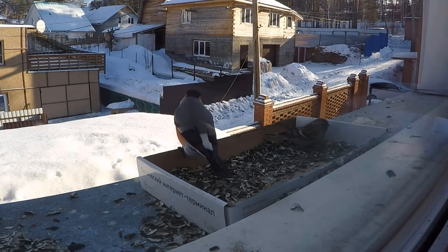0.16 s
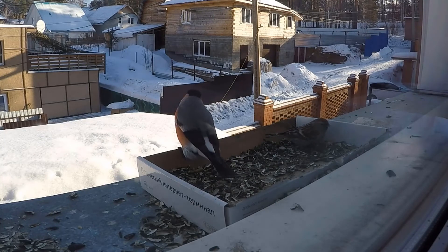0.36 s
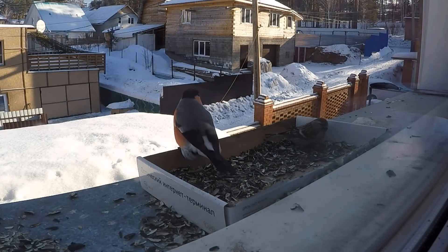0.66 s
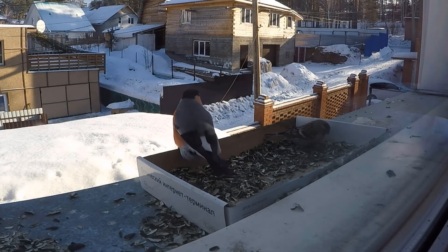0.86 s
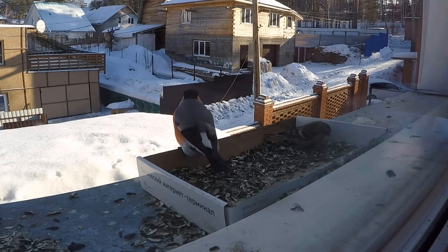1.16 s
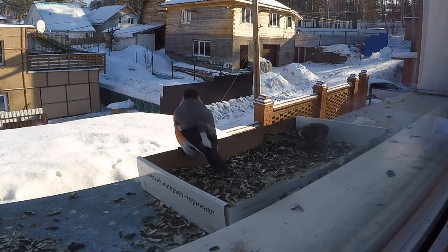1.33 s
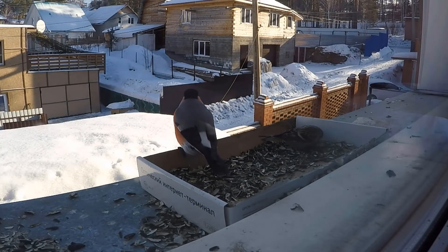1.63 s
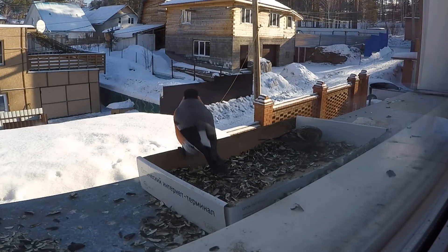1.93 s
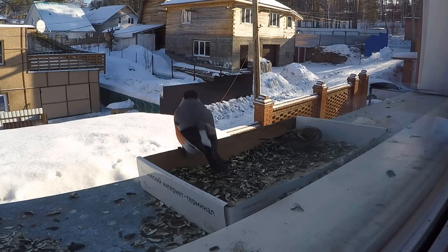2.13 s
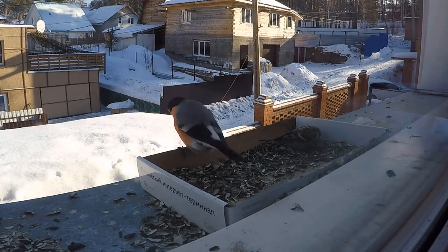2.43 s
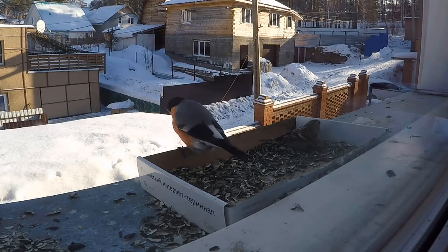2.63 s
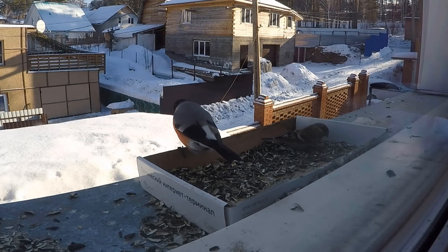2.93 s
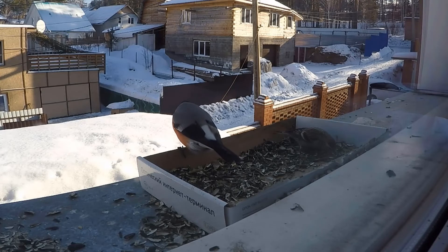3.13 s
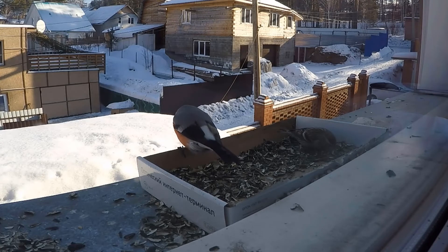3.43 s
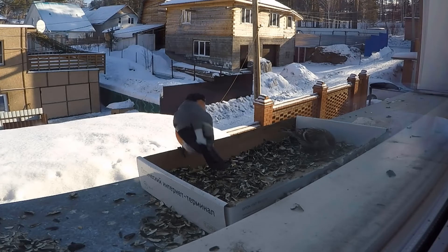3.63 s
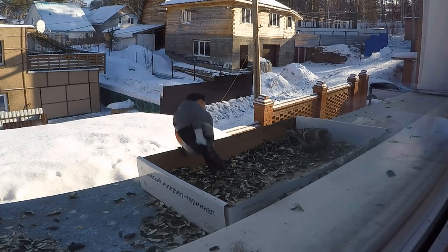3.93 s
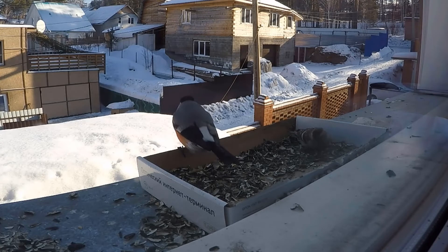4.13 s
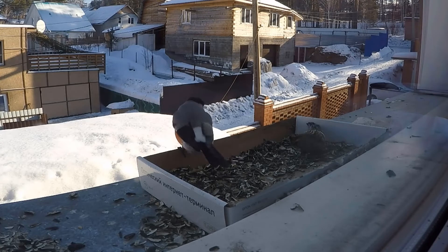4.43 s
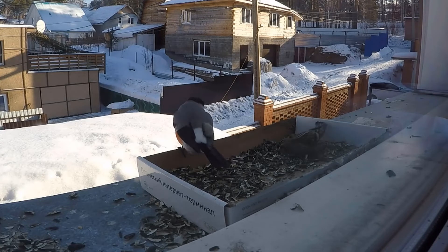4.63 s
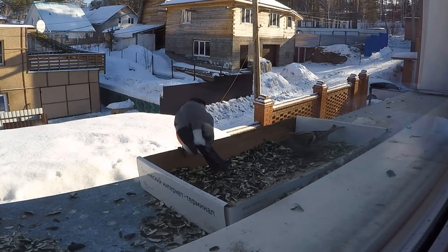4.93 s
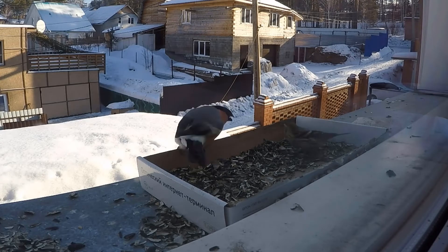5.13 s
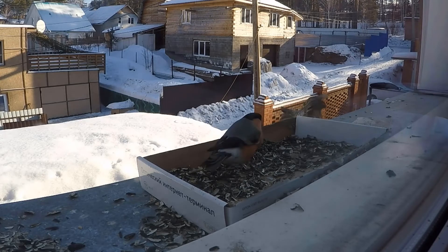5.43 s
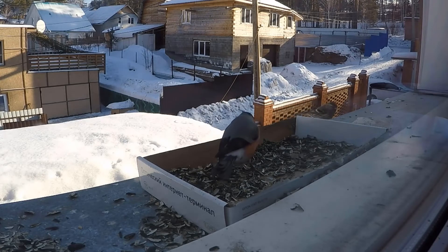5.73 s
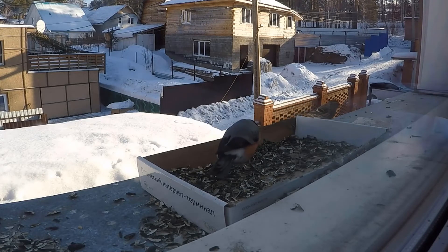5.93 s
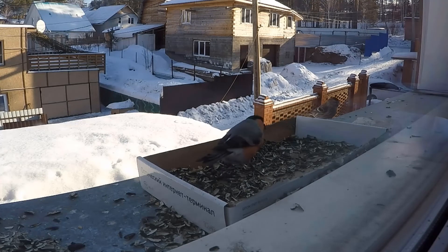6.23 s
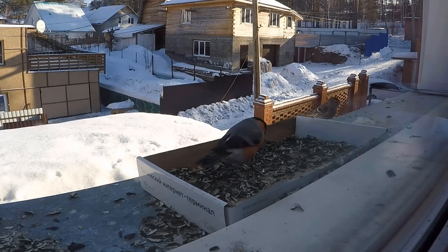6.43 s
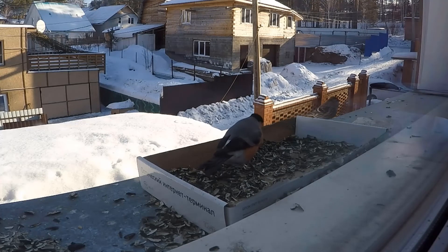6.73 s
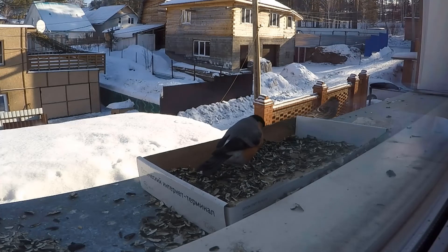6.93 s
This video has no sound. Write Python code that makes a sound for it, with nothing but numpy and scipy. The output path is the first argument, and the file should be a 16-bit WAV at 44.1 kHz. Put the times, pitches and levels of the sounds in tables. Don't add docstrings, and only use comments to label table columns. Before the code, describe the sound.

Close beside a seed tray outdoors, soft hiss, faint traffic and low wind rumble run throughout, with a distant unsteady engine hum fading out around 4 s. The first second and a half holds only a few light ticks. At about 1.5-1.8 s a cluster of dry pecks peaks in a hard woody knock and crack at 1.63. Smaller taps follow at 2.4, and a firmer seed crack with rustling at 3.2; light pecks come at 3.7-3.8. From 4.2 to 4.8 s the pecking grows busy, with gritty scrapes, bright husk snaps and sharp clicks. At 5.15-5.6 s comes the loudest burst: wings flutter, seeds scatter and rattle, a short falling chirp sounds near 5.25, a rough low churr near 5.38, and air thumps the microphone. Wind buffeting eases after 5.8 s, leaving sparse ticks and small cracks at 6.2, 6.4 and 6.6, and a last peck and low thump near 7 s.

```python
import sys
import numpy as np
from scipy import signal
from scipy.fft import rfft, irfft, next_fast_len
from scipy.io import wavfile
from scipy.ndimage import map_coordinates

SR = 44100
rng = np.random.default_rng(int(sys.argv[2]) if len(sys.argv) > 2 else 0)


def wrap_up_sound(samples):
    columns = np.atleast_2d(samples).T
    tamed = np.clip(columns, -1, 1)
    steps = np.round(tamed * 32767).astype(np.int16)
    wavfile.write(sys.argv[1], SR, steps)


def volts(x):
    e = np.asarray(x, float) / 20
    return 10 ** e


N = 311346

# f/Hz, level/dB per Hz
GRIT = [(900, -5.5), (1800, -0.5), (3000, -4.5), (5000, -6), (7500, -10)]


def unit(x):
    return x / np.sqrt(np.mean(x ** 2) + 1e-20)


def curves(rows):
    s, *cols = np.transpose(rows)
    t = np.arange(N) / SR
    gate = np.clip(np.minimum(t - s[0], s[-1] - t) / 0.00086, 0, 1)
    return [np.interp(t, s, c) for c in cols] + [gate]


def wobble(rate):
    knots = rng.standard_normal(int(N * rate / SR) + 4)
    return map_coordinates(knots, [np.arange(N) * rate / SR])


def add_at(out, s, sound):
    start = round(s * SR)
    out[..., start:start + sound.shape[-1]] += sound


def filtered(x, response):
    m = next_fast_len(N + SR // 2)
    return irfft(rfft(x, m) * response(np.fft.rfftfreq(m, 1 / SR)), m)[:N]


def shape(points):
    f, v = np.transpose(points)
    return lambda hz: volts(np.interp(np.log(hz + 1), np.log(f + 1), v, -120, -120))


def modes(table):
    def response(f):
        total = 0
        for k, (centre, width, db) in enumerate(table):
            damping = 1j * f * width
            total = total + (-1) ** k * volts(db) * damping / (centre * centre - f * f + damping)
        return total
    return response


def band(x, response):
    power = np.mean(np.abs(response(np.linspace(1, SR / 2, num=8192))) ** 2)
    return filtered(x, response) / np.sqrt(power)


def steady(x, hold):
    envelope = np.abs(signal.hilbert(x, next_fast_len(N))[:N] + 1e-9)
    return unit(x / envelope ** np.clip(hold, 0, 1))


def voices(low, mid, high):
    # f/Hz, width/Hz, level/dB
    wall_modes = [(620, 1400, 0), (1150, 800, 6)]
    # f/Hz, width/Hz, level/dB
    bed_modes = [(2050, 54, -2), (2320, 66, -8), (2640, 57, 0.5), (3240, 100, 0.5)]
    # f/Hz, level/dB per Hz
    husk_colour = [(4000, -6), (6000, 2.5), (8500, 3.5), (10300, 2.5), (12500, -0.5), (16000, -6)]
    walls = band(low, lambda f: modes(wall_modes)(f) / (1 + 1j * f / 1800))
    bed = band(mid, lambda f: (modes(bed_modes)(f) + 0.32) * shape(GRIT)(f))
    return walls + bed + band(high, shape(husk_colour))


def pings(events, cycles, rise, lift_db):
    out, t = np.zeros(N + SR), np.arange(SR // 50) / SR
    for s, db, hz in events:
        splinter_hz = min(1.59 * hz, 14500)
        tones = np.sin(2 * np.pi * hz * t) + 0.31 * np.sin(2 * np.pi * splinter_hz * t)
        decay = volts(db + lift_db - 60 * t * hz / cycles)
        add_at(out, s + .001, decay * tones * (1 - np.exp(-t * hz / rise)))
    return out[:N]


def street():
    # f/Hz, level/dB per Hz
    hiss_colour = [(41, -22), (70, -2.5), (96, -9), (126, -12), (205, -19.5), (462, -26), (1020, -31.5),
                   (16000, -45.5)]
    # t/s, level/dB
    traffic = [(0, -61), (1, -60.5), (2.4, -63), (3.5, -67), (5, -62), (7.06, -61.5)]
    # f/Hz, level/dB per Hz
    road_colour = [(180, -28), (300, 10), (430, -16.5), (570, 7), (750, -29), (950, -1), (1500, -14),
                   (3000, -17.5)]
    air = filtered(rng.standard_normal(N), lambda f: shape(hiss_colour)(f) / (1 + (f / 15500) ** 30))
    level = np.std(filtered(air, lambda f: f > 300))
    swell = volts(curves(traffic)[0] - 3.0 + wobble(2.64))
    road = swell * band(rng.standard_normal(N), shape(road_colour))
    hiss_db = -60 + 0.5 + 0.97 * wobble(1.72) + 0.7 * wobble(13)
    return volts(hiss_db) * air / level + road


def engine():
    # t/s, f/Hz, level/dB
    firing = [(0.0, 131, -63), (0.19, 122.7, -58), (0.57, 124.4, -55.5), (1.25, 124, -55.5),
              (1.4, 123.8, -49.5), (1.73, 124, -50), (2.15, 127.4, -58), (2.82, 119.7, -56),
              (3.71, 118.9, -59.5), (3.98, 123.2, -62.5), (4.1, 121.1, -84)]
    hz, db, gate = curves(firing)
    first_phase = 2 * np.pi * np.cumsum(hz + 1.47 * wobble(7.61)) / SR
    second_phase = 2 * np.pi * np.cumsum(146 + 1.39 * wobble(8.24)) / SR
    first = volts(db + 3.9 * wobble(6.18)) * np.sin(first_phase)
    second = volts(-62 + 0.59 * wobble(5.5)) * np.sin(second_phase)
    return np.sqrt(2) * gate * (first + second)


def wind():
    # t/s, level/dB
    breeze = [(0, -51), (.5, -51.5), (1.2, -55), (2.6, -50.5), (4.05, -54.5), (4.2, -46.5), (5.9, -39.5),
              (6.5, -51.5), (7.06, -49.5)]
    # t/s of the middle, level/dB, half length/s
    gusts = [(0.135, -42, 0.013), (0.302, -44, 0.015), (0.77, -42.5, 0.1), (0.905, -32.5, 0.033),
             (1.544, -38.5, 0.012), (2.04, -44, 0.06), (2.237, -44, 0.19), (4.148, -30.5, 0.016),
             (4.238, -35.5, 0.037), (4.508, -30.5, 0.047), (4.782, -29, 0.017), (4.943, -35.5, 0.096),
             (5.04, -34, 0.057), (5.28, -31.5, 0.11), (5.512, -29.5, 0.091), (5.734, -22.5, 0.022),
             (6.04, -35, 0.097), (6.32, -34, 0.078), (6.701, -42, 0.0091), (6.864, -34.5, 0.0091)]
    # t/s, peak level/dB, f/Hz, t60/s
    pushes = [(0.877, -31.5, 45.6, 0.1), (5.411, -15, 65, 0.061), (5.432, -13, 51.4, 0.041),
              (5.482, -20, 49, 0.11), (5.523, -21, 61, 0.16), (5.7037, -20, 171, 0.027),
              (5.7145, -20.5, 47.8, 0.21), (5.734, -23, 59.7, 0.075), (6.023, -27.5, 62, 0.17),
              (2.0, -32, 39.64, 0.1), (4.241, -26.5, 44.8, 0.072), (6.189, -26, 44.6, 0.13),
              (7.039, -15.5, 57.3, 0.08)]
    # f/Hz, level/dB per Hz
    buffet_colour = [(8, -20), (22, -12), (32, -3), (41, 0.5), (54, -9.5), (75, -13)]
    # f/Hz, level/dB per Hz
    flap_colour = [(40, -17), (58, 0), (80, -7), (105, -16), (150, -28)]
    t = np.arange(N) / SR
    force = volts(curves(breeze)[0])
    for s, db, half in gusts:
        force += volts(db) * np.exp(-((t - s) / half) ** 2)
    buffeting = force * steady(filtered(rng.standard_normal(N), shape(buffet_colour)), hold=0.43)
    edge_force = volts(-52.5) * (force / volts(-49.5)) ** 0.78
    edge = edge_force * steady(filtered(rng.standard_normal(N), shape(flap_colour)), hold=0.39)
    out, t = np.pad(buffeting + edge, (0, SR)), np.arange(SR // 4) / SR
    for s, peak_db, hz, t60 in pushes:
        decay = volts(peak_db + 5.5 - 60 * t / t60)
        add_at(out, s, decay * np.sin(2 * np.pi * hz * t) * (1 - np.exp(-(t / 0.0038) ** 2)))
    return out[:N]


def wings():
    # t/s of the middle, level/dB, length/s
    scuffle = [
        (5.169, -56, 0.13),
        (5.241, -43, 0.067),
        (5.307, -29, 0.024),
        (5.385, -49.5, 0.044),
        (6.203, -62, 0.073),
    ]
    # t/s of the middle, level/dB, length/s
    take_off = [(5.341, -46.5, 0.032), (5.403, -53, 0.058), (5.413, -58, 0.015), (5.444, -52, 0.055),
                (5.478, -49.5, 0.024), (5.492, -51.5, 0.03), (5.523, -46.5, 0.036), (5.554, -50, .022),
                (5.572, -48, 0.033), (5.608, -56, 0.072), (6.247, -63, 0.14)]
    # f/Hz, level/dB per Hz
    push_colour = [(120, 4.5), (250, 1), (500, -5), (1000, -10), (1800, -22)]
    # f/Hz, level/dB per Hz
    plume_colour = [(4000, -12), (6500, -3), (10000, 0), (13500, -0.5), (16200, -2)]
    t, drive = np.arange(N) / SR, np.zeros((3, N))
    for strokes, push_db, hiss_db in [(scuffle, -8, -5), (take_off, 5.4, -1.1)]:
        for s, db, length in strokes:
            steepness = np.where(t < s, 3.4, 1.9)
            swell = np.exp(-(steepness * (t - s) / length) ** 2)
            drive += volts([[db + push_db], [db], [db + hiss_db]]) * swell
    flutter_db = 0.7 * wobble(250) + 1.1 * np.array([wobble(70), wobble(90), wobble(140)])
    push, rustle, hiss = drive * rng.standard_normal((3, N)) * volts(flutter_db)
    return band(push, shape(push_colour)) + band(rustle, shape(GRIT)) + band(hiss, shape(plume_colour))


def whistle(rows, overtones_db, rough, waver, flutter_hz):
    hz, db, gate = curves(rows)
    phase = 2 * np.pi * np.cumsum(hz * (1 + waver * wobble(250))) / SR
    tone = np.sin(phase)
    for k, overtone_db in enumerate(overtones_db):
        tone += volts(overtone_db) * np.sin((k + 2) * phase)
    return np.sqrt(2) * gate * volts(db + rough * wobble(flutter_hz)) * tone


def calls():
    # t/s, f/Hz, level/dB
    chirps = [
        [(5.218, 2460, -55), (5.23, 2440, -42), (5.245, 2350, -31.5), (5.256, 2384, -32), (5.266, 2370, -34),
         (5.276, 2336, -30.5), (5.292, 2290, -36), (5.299, 2280, -41)],
    ]
    # t/s, f/Hz, level/dB
    churr = [
        [(5.342, 1520, -46), (5.35, 1443, -46), (5.362, 1302, -45), (5.372, 1198, -45), (5.383, 1150, -40),
         (5.395, 1120, -48), (5.405, 1240, -49), (5.414, 1380, -44), (5.42, 1400, -52)],
    ]
    upper = [(s, 1.72 * hz, db - 15) for s, hz, db in churr[0]]
    clear = sum(whistle(c, [-24, -30, -17], rough=1.2, waver=0.0049, flutter_hz=204) for c in chirps)
    return clear + sum(whistle(c, [-14], rough=5.5, waver=0.06, flutter_hz=700) for c in churr + [upper])


def scrapes():
    # t/s of the middle, level/dB, f/Hz, length/s
    rakes = [
        (3.719, -53, 2700, 0.026),
        (4.21, -50, 2740, 0.011),
        (4.238, -45, 2640, 0.038),
        (4.268, -52, 2660, 0.029),
        (4.645, -52.5, 2740, 0.061),
    ]
    t, out = np.arange(-SR // 10, SR // 10) / SR, np.zeros(N)
    clumps = volts(2.9 * wobble(300))
    for s, db, hz, length in rakes:
        swell = rng.standard_normal(len(t)) * np.exp(-(1.7 * t / length) ** 2)
        b, a = signal.iirpeak(hz, 2.2, SR)
        twice = signal.lfilter(b, a, signal.lfilter(b, a, swell))
        add_at(out, s - 0.1, volts(db + 13.5) * twice)
    return out * clumps


def shuffle():
    # start t/s, loudest t/s, end t/s, peak level/dB, brightness/dB
    shoves = [
        (1.512, 1.646, 1.77, -42, -4),
        (2.39, 2.404, 2.43, -39, 8),
        (3.06, 3.202, 3.37, -45, -3),
        (4.2, 4.22, 4.56, -49, 4.5),
        (4.6, 4.656, 4.96, -53, 10.5),
        (5.179, 5.293, 5.45, -29, 1),
        (6.16, 6.185, 6.65, -54.5, 9.5),
    ]
    drive = np.zeros((3, N))
    grit = unit(rng.standard_normal((3, N)) * volts(2.2 * wobble(90) + 4.4 * wobble(700)))
    for start, peak, end, peak_db, bright_db in shoves:
        levels = peak_db - np.array([19.5, 0, 20.5])
        walls_db, husks_db = (-20, -1, 1), (5, 3, -8)
        rows = np.transpose([(start, peak, end), levels, walls_db, husks_db])
        db, low_db, high_db, gate = curves(rows)
        drive += gate * volts([db + low_db - 13.5, db - 9.0, db + high_db + bright_db - 15])
    return voices(*(drive * grit))


def ticks():
    # t/s, peak level/dB, f/Hz
    touches = [(.0137, -43, 7700), (.0195, -39, 10900), (.636, -48, 11500), (.8403, -49, 6500),
               (.9574, -49, 11500), (.966, -50, 11500), (.9829, -44, 11500), (1.3458, -50, 6000),
               (1.5538, -49, 4000), (1.5701, -32.5, 5800), (1.5752, -41, 6500), (1.5908, -49, 7500),
               (1.6155, -43, 7500), (1.6286, -43, 7500), (1.6468, -37, 11000), (1.68, -51, 7500),
               (1.6917, -50, 6000), (1.7234, -49, 7035), (3.0969, -42, 5500), (3.102, -45, 5460),
               (3.134, -45, 6000), (3.1556, -43, 8000), (3.1602, -48, 11070), (3.2312, -44, 6000),
               (3.4126, -44.5, 6500), (3.6078, -48, 11000), (3.8574, -47, 6500), (4.2443, -31, 6000),
               (4.296, -26, 6000), (4.2902, -43, 5500), (4.5248, -44, 6400), (4.6261, -30.5, 6300),
               (4.6573, -38, 6500), (4.6795, -41, 9500), (4.7141, -32, 5500), (4.7767, -38, 11500),
               (4.7852, -43, 5500), (4.8256, -47, 12000), (4.8546, -45, 11000), (6.1792, -41, 6500),
               (6.1837, -48, 8500), (6.19, -39, 11000), (6.2242, -40, 12000), (6.2294, -43, 12000),
               (6.2519, -35, 12000), (6.2768, -54, 11000),
               (5.1373, -43, 8500), (5.23, -23, 5960), (5.239, -20.5, 6500), (5.2724, -23, 7000),
              (5.2723, -24, 3800), (5.2808, -26, 12500), (5.2862, -14, 9900), (5.3147, -21, 11400),
              (5.3698, -39, 6500), (5.3833, -32, 6000), (5.3849, -29, 12000), (5.4014, -39, 6500),
              (5.5507, -35, 11500), (5.5535, -33, 11500), (5.5703, -31, 13000), (5.5786, -37, 12600),
              (5.605, -35, 13000), (5.8104, -39, 13000)]
    # t/s, peak level/dB, f/Hz
    bumps = [(1.3362, -40, 2700), (1.635, -23, 1580), (1.6425, -35, 1500), (2.403, -44, 1420),
             (2.445, -50, 2900), (3.222, -42, 2640), (3.236, -44, 2300), (5.3065, -21, 1260),
             (5.4845, -31.5, 700), (5.2785, -24, 1700), (2.415, -44, 1300), (2.432, -38, 1450),
             (2.9306, -40, 3200), (3.1918, -41, 1290), (3.1927, -19.5, 2670), (3.2132, -36, 1500),
             (4.2128, -43, 2900), (4.2255, -34, 3100), (4.2292, -49, 2030), (4.2445, -49, 2100),
             (4.2685, -46, 2200), (4.6034, -44, 2500), (4.648, -40, 2900), (4.654, -37, 2300),
             (5.4456, -25, 3870), (5.5215, -31, 2930), (5.414, -35, 1300), (4.2385, -37, 2100),
             (4.2613, -42, 2320), (4.7718, -17.5, 3150), (5.1529, -44, 2500), (5.1603, -35, 2800),
             (5.1777, -30, 3000), (5.3799, -41, 2100), (5.4398, -45, 2300), (5.476, -34, 750),
             (5.5541, -32, 2300), (5.559, -27.5, 594), (5.592, -38, 900), (5.6112, -50, 910),
             (6.1815, -37, 3500), (6.4188, -37, 3020)]

    def lead(rows):
        return [(s - .0014, db, hz) for s, db, hz in rows]
    dry_ticks = pings(lead(touches), cycles=10.4, rise=0.61, lift_db=8.5)
    return dry_ticks + pings(lead(bumps), cycles=4.5, rise=0.37, lift_db=6.0)


def knocks():
    # t/s, peak level/dB
    blows = [
        (1.6336, -11.5),
        (1.657, -38),
        (2.4, -38),
        (3.181, -31.5),
        (4.311, -38),
        (6.413, -33.5),
    ]
    # f/Hz, level/dB, t60/s
    board = [(308, -5, 0.094), (363, 7, 0.037), (334, -19.5, 0.27), (517, 3.5, 0.052), (633, 9, 0.037),
             (900, -15.5, 0.045), (1214, -10, 0.05)]
    # t/s, level/dB, f/Hz, t60/s
    raps = [(1.6795, -42, 420, 0.13), (2.418, -49, 1710, 0.11), (2.412, -50.5, 2960, 0.096),
            (5.4, -37, 880, .06), (1.634, -28, 2060, 0.042), (2.399, -38.5, 4230, 0.032),
            (2.405, -46, 1495, .08), (3.1802, -32.5, 2613, 0.11), (3.1802, -33.5, 1190, .04),
            (3.1812, -35, 1930, .06), (3.8328, -40, 2605, 0.072), (1.662, -36, 614, 0.066),
            (1.657, -40, 1240, 0.049), (1.845, -43, 1200, 0.027), (4.223, -36.5, 3100, 0.06),
            (4.229, -40, 2010, .05), (4.238, -39, 2030, 0.044), (4.296, -45, 620, 0.026),
            (4.633, -50, 940, .05), (5.158, -34, 753, .04), (5.177, -39, 785, 0.092),
            (5.246, -36.5, 570, 0.096), (5.299, -13.5, 1150, 0.017), (5.38, -28, 1150, 0.019),
            (5.44, -33, 350, 0.056), (5.48, -31, 330, 0.056), (5.514, -34, 298, 0.069),
            (5.555, -35, 393, 0.076), (5.606, -42.5, 923, .08), (6.414, -39, 1030, 0.03)]
    out, t = np.zeros(N + SR), np.arange(SR // 5) / SR
    ring = sum(volts(g - 60 * t / t60) * np.sin(2 * np.pi * hz * t) for hz, g, t60 in board)
    for s, db in blows:
        rattle = rng.standard_normal(len(t)) * volts(-34.0 - 60 * t / 0.022)
        shaken = signal.fftconvolve(ring, rattle)[:len(t)]
        add_at(out, s, volts(db - 10.5) * (ring * (1 - np.exp(-t / 0.007)) + shaken))
    for s, db, hz, t60 in raps:
        tone = volts(db - 60 * t / t60) * np.sin(2 * np.pi * hz * t)
        add_at(out, s, tone * (1 - np.exp(-t * hz / 1.2)))
    return out[:N]


def snaps():
    # t/s, peak level/dB, f/Hz
    splits = [(0.627, -42.5, 10900), (0.97, -47, 9200), (1.53, -47, 9900), (1.632, -34, 5800),
              (2.4003, -35, 6300), (2.9295, -50, 5600), (3.1804, -51, 5840), (3.191, -36.5, 5700),
              (3.336, -53, 6900), (3.8332, -45, 5500), (4.2948, -25.5, 8360), (4.3024, -37, 5510),
              (4.312, -38, 5660), (4.4233, -52, 5540), (4.7008, -28, 5760), (4.7174, -36, 6760),
              (4.7696, -32.5, 11700), (5.1352, -61, 5240), (5.2724, -26, 8000), (5.2852, -26, 6560),
              (5.3061, -25, 6550), (5.3458, -43, 8000), (5.3812, -34, 12600), (5.4451, -43, 6900),
              (5.5201, -32.5, 11700), (6.1883, -44, 9530), (6.1954, -39, 9880), (6.229, -44, 6270),
              (6.2405, -33, 8040), (6.4587, -49, 8400), (6.6216, -42.5, 6200)]
    # t/s, peak level/dB, f/Hz
    cracks = [(1.6325, -13.5, 2650), (1.7679, -41, 3600), (2.3965, -29, 3800), (2.524, -43.5, 2000),
              (3.1797, -32, 2630), (3.8342, -34, 2680), (4.4233, -39.5, 2590), (4.6998, -19.5, 3040),
              (6.134, -47, 3260), (6.2886, -35.5, 1890), (6.621, -30.5, 3670)]
    # f/Hz, width/Hz, level/dB
    panel = [(2050, 55, -3), (2630, 60, 4), (2950, 50, -1)]
    husks = pings(splits, cycles=25.3, rise=0.84, lift_db=9.5)
    kernels = pings(cracks, cycles=11.2, rise=0.063, lift_db=-0.5)
    return husks + kernels + filtered(kernels, modes(panel))


def pecks():
    # t/s, peak level/dB, f/Hz, t60/s
    landing = [
        (5.147, -45, 850, 0.16),
        (5.1771, -37.5, 1780, 0.029),
    ]
    on_wall = [(1.5578, -28, 3230, 0.082), (1.6317, -15.5, 2860, 0.049), (1.6553, -25.5, 2050, 0.044),
               (1.8432, -40, 2800, 0.057), (2.124, -45.5, 3800, 0.048), (4.6438, -39, 2920, 0.077),
               (6.2877, -34, 1790, 0.058), (6.3032, -43, 1820, 0.025), (6.4112, -41, 1610, 0.018),
               (7.006, -38, 3360, 0.027)]
    on_rim = [(.0149, -37, 1600, 0.048), (.2772, -44, 1940, 0.035), (.9697, -40, 4270, 0.051),
              (2.396, -33.5, 4020, 0.083), (2.9286, -39, 5600, 0.026), (3.6131, -42.5, 2310, 0.041),
              (4.6244, -29.5, 5500, 0.034), (5.803, -46, 4000, 0.081), (6.1894, -34, 3490, 0.061)]
    on_husk = [(.6275, -37, 1730, 0.034), (1.614, -27.5, 2050, 0.13), (1.713, -37, 3620, 0.071),
               (3.1398, -36.5, 2800, 0.045), (4.2943, -27.5, 5840, 0.054), (4.3122, -22, 4570, 0.021),
               (4.3234, -29.5, 2950, 0.031), (4.4233, -37.5, 2630, 0.032), (4.5564, -38.5, 1810, 0.026),
               (4.734, -31, 1710, 0.038), (4.9003, -41.5, 1590, .04), (5.2175, -24, 2420, 0.13),
               (5.241, -19, 2330, 0.051), (5.254, -21, 1900, 0.035), (5.2705, -15.5, 2230, 0.039),
               (5.3136, -17, 3480, 0.041), (5.346, -27, 2850, 0.028), (5.4445, -26, 3300, 0.026),
               (7.0384, -39.5, 2300, 0.028)]
    on_chaff = [(1.7054, -47, 2020, 0.037), (4.678, -38, 5140, 0.044), (5.684, -59, 4000, .03),
                (5.757, -54, 5000, 0.021), (6.238, -42, 5080, 0.057), (6.4447, -50, 5000, 0.018)]
    on_seed = [(1.508, -42.5, 3000, 0.11), (1.569, -30.5, 2060, 0.067), (1.5984, -32, 5020, 0.032),
               (3.1908, -24, 2870, 0.07), (3.7118, -36.5, 2710, 0.044), (3.8331, -32.5, 2660, .064),
               (4.2366, -31, 2650, 0.046), (4.2662, -33, 2920, 0.037), (4.2858, -29.5, 2600, 0.14),
               (4.7002, -26, 2930, 0.064), (4.7122, -25.5, 5100, 0.04), (5.3071, -17.5, 5370, 0.03),
               (6.133, -34.5, 3480, 0.021)]
    on_kernel = [(1.3352, -39.5, 2780, 0.087), (1.7672, -30, 3240, 0.0096), (2.5237, -45, 1630, 0.011),
                 (3.0762, -37, 2350, 0.036), (3.096, -35, 2210, 0.059), (3.1802, -21, 3130, 0.03),
                 (3.3235, -40.5, 2620, .05), (3.7244, -40, 2020, 0.07), (4.034, -39.5, 2220, 0.13),
                 (4.2088, -38, 2920, 0.033), (4.2238, -33, 3120, 0.11), (4.7702, -28, 3230, 0.048),
                 (6.6199, -33.5, 3700, 0.061)]
    # contacts, wall knock/dB, husk brightness/dB
    kinds = [(landing, 8, -14), (on_wall, -9.5, -15), (on_rim, -9, 1), (on_husk, -23.5, -0.51),
             (on_chaff, -26, 12.8), (on_seed, -17, -4.5), (on_kernel, -16, -12)]
    drive, own, t = np.zeros((3, N + SR)), np.zeros(N + SR), np.arange(SR // 6) / SR
    for rows, knock_db, bright_db in kinds:
        for s, db, hz, t60 in rows:
            life = np.clip(t60, .004, .2) * np.array([[1.3], [1.05], [.6], [.95]])
            envelope = volts(-60 * t / life) * (1 - np.exp(-t / (0.073 * life)))
            rattle = rng.standard_normal((4, len(t))) * envelope
            gains = volts([[db + knock_db - 0.5], [db - 15.5], [db + bright_db - 7.5]])
            add_at(drive, s, gains * rattle[:3])
            b, a = signal.iirpeak(hz, 4, SR)
            add_at(own, s, volts(db + 4.0) * signal.lfilter(b, a, rattle[3]))
    return voices(*drive[:, :N]) + own[:N]


def scene():
    background = street() + engine() + wind()
    birds = wings() + calls()
    tray = scrapes() + shuffle() + ticks() + knocks() + snaps() + pecks()
    return (background + birds + tray)[None]


def band_limit(x):
    return signal.sosfilt(signal.butter(12, 16100, fs=SR, output="sos"), x)


def record(dry):
    # t/s, level/dB
    ducking = [(0, 0), (2.5, 0.5), (2.8, .5), (3.6, -.5), (5.7, 0), (5.9, -0.5), (6.1, 0), (6.35, -0.5),
               (7.06, 0.5)]

    def housing(f):
        notch = 1 - 0.44 / (1 + ((f - 10300) / 200) ** 2)
        return notch / (1 + (f / 16050) ** 60)
    mix = filtered(dry[0] * volts(curves(ducking)[0]), housing)[None]
    return band_limit(mix)


dry = scene()
out = record(dry)
wrap_up_sound(out)
```